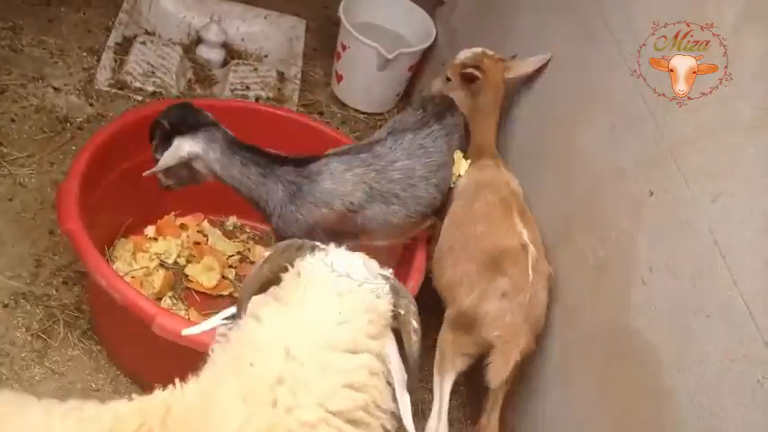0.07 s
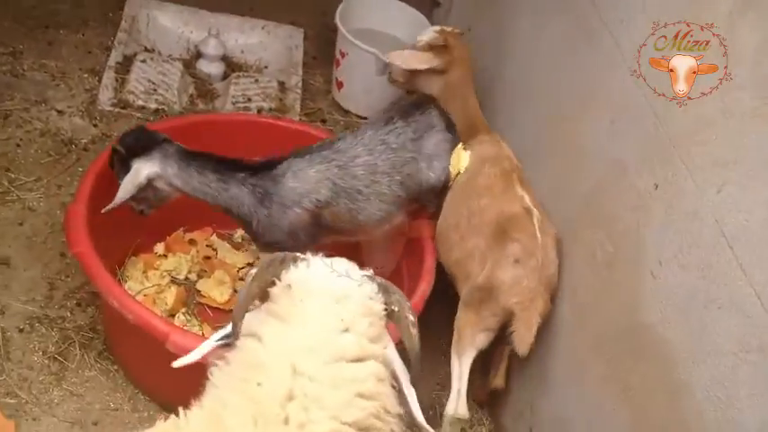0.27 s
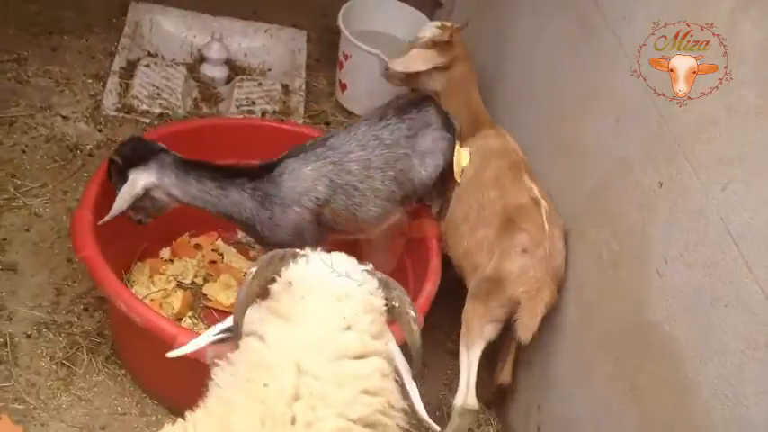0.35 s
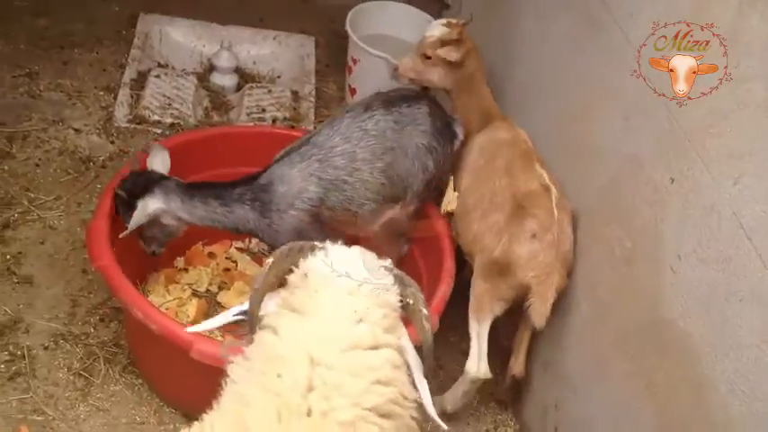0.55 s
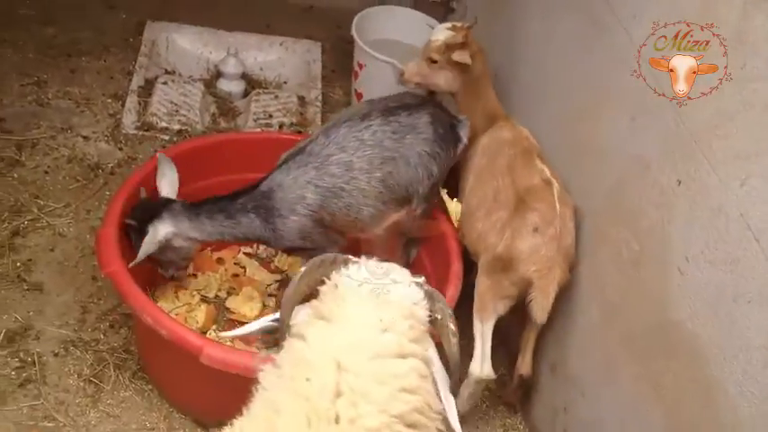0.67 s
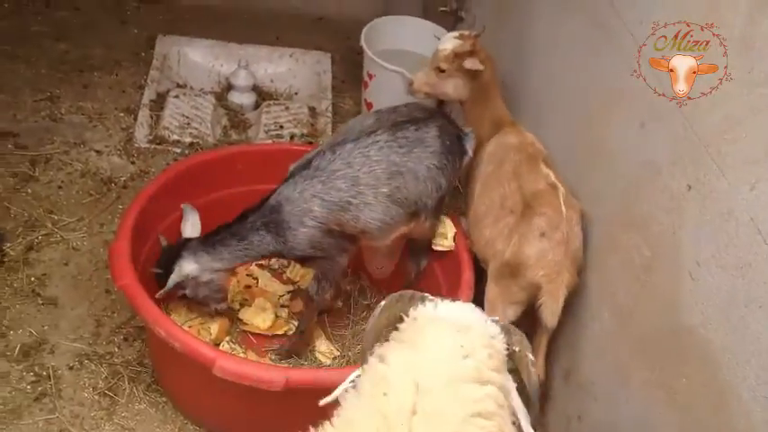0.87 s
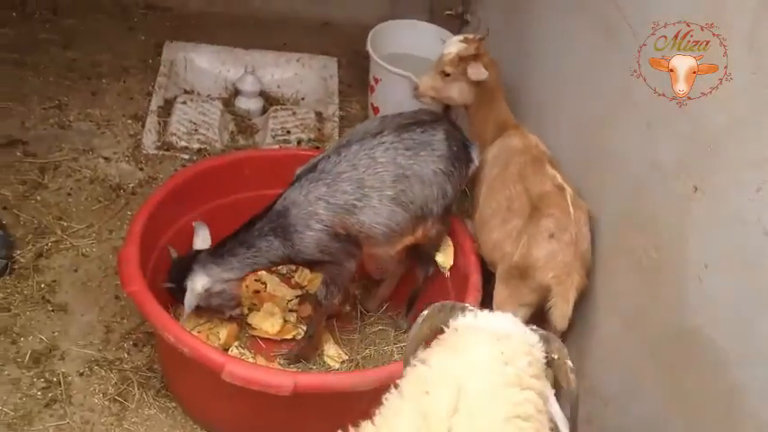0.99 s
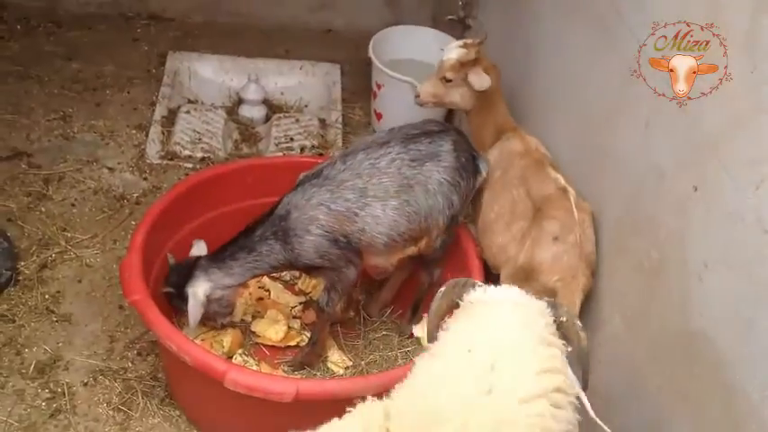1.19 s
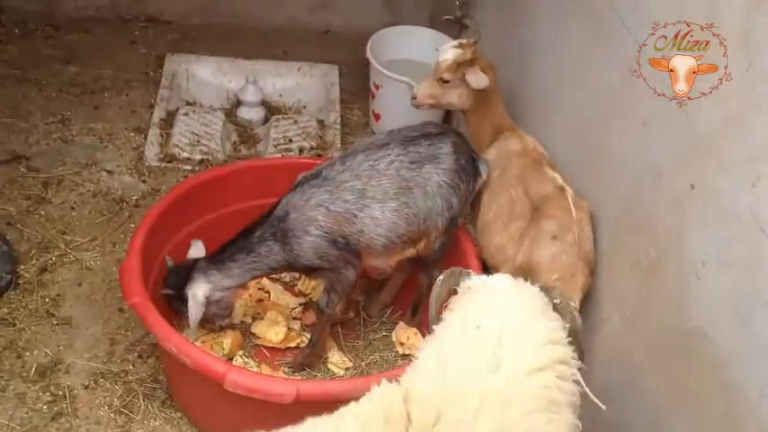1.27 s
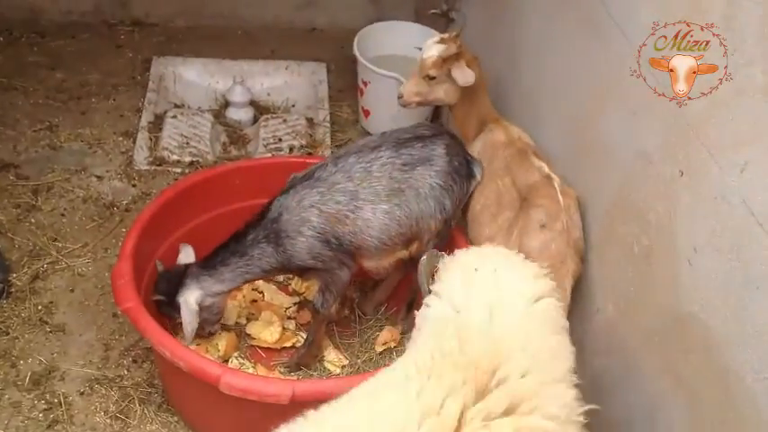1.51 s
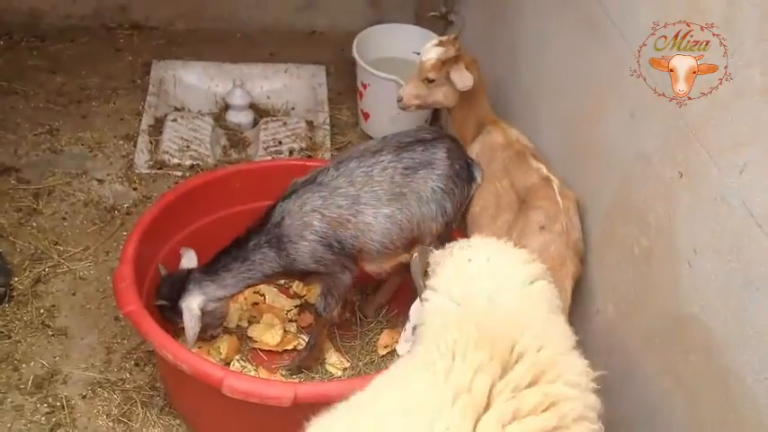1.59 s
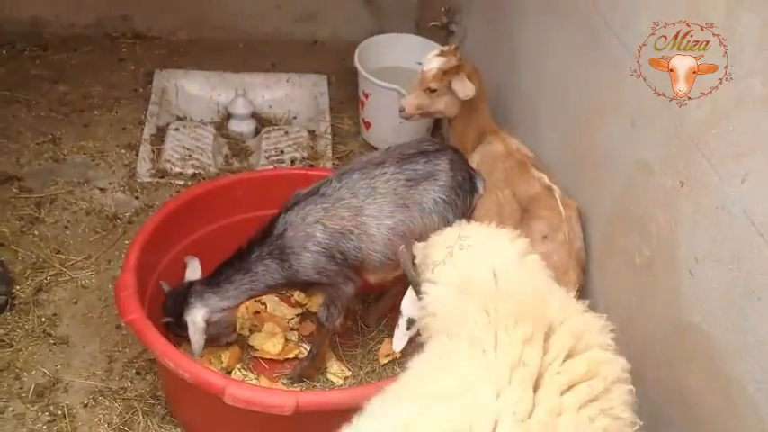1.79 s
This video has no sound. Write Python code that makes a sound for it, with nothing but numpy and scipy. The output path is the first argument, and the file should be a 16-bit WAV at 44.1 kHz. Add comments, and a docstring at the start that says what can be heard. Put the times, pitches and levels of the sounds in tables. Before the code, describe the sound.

Hollow knocks ring and rattle a plastic feed tub twice as a goat moves inside, rubbing the rim between them. Quiet hoof scuffs, bumps and dry straw crackles then fade over a faint hum in a small pen.

```python
"""Goat in a feed tub

A goat steps into a wide plastic tub in a small concrete pen: two hard knocks with rebounds, then softer
bumps, ring the hollow body and clatter the thin wall. A flank drags along the rim, hooves clack and
scuff, straw and dry feed rustle and crack as the animals shift, and a faint motor hums behind."""
import sys
import numpy as np
from scipy import signal
from scipy.fft import rfft, irfft
from scipy.io import wavfile

SR = 44100
rng = np.random.default_rng(int(sys.argv[2]) if len(sys.argv) > 2 else 0)


def materialize(psi):
    """Save the field psi as 16-bit PCM at rate SR to the path in sys.argv[1].

    A 1-D psi becomes a single channel; in a 2-D psi each row is a channel.
    """
    bounded = np.clip(np.atleast_2d(psi).T, -1, 1)
    quanta = np.round(bounded * 32767).astype(np.int16)
    wavfile.write(sys.argv[1], SR, quanta)


N = 81585
T = np.arange(N) / SR
HZ = np.maximum(np.fft.rfftfreq(N, 1 / SR), 1)


def from_db(db):
    """Decibels to gain."""
    return 10 ** (np.asarray(db) / 20)


def unit_rms(x):
    """Scale to rms 1."""
    return x / np.sqrt(np.mean(x ** 2) + 1e-20)


def at_hz(points, hz):
    """Read a curve on a log-frequency axis."""
    f, value = np.transpose(points)
    return np.interp(np.log(hz), np.log(f), value)


def coloured(noise, spectrum, tilt_db=0):
    """Shape noise with an EQ curve and a tilt per octave above 500 Hz; rms 1."""
    eq_db = at_hz(spectrum, HZ) + tilt_db * np.log2(np.maximum(HZ, 500))
    return unit_rms(irfft(rfft(noise) * from_db(eq_db), N))


def decaying(noise, t60s):
    """Let noise die away, each octave at its own rate."""
    octave = np.clip(np.log2(HZ / 100), 0, 7)
    spectrum = rfft(noise)
    bands = (irfft(spectrum * np.maximum(1 - abs(octave - k), 0), N) for k in range(8))
    return sum(band * from_db(-60 * T / at_hz(t60s, 100 * 2 ** k)) for k, band in enumerate(bands))


def swell(peak, rise, fall):
    """An envelope that rises and falls exponentially around its peak."""
    return np.exp(-np.maximum((peak - T) / rise, (T - peak) / fall))


def ring(modes, tilt_db=0, length=1, body_hz=267):
    """Struck modes: a harder blow favours those above the body note; a leaning leg shortens them."""
    out = np.zeros(N)
    for k, (hz, db, t60) in enumerate(modes):
        strike_db = db + tilt_db * np.log2(max(hz, body_hz) / 300)
        envelope = from_db(strike_db - 60 * T / (t60 * length))
        out += (-1) ** k * envelope * np.sin(2 * np.pi * hz * T)
    return out


def hit_at(start, blow, contact_s=0.0011):
    """Place a blow in time, its attack softened by the contact."""
    return np.interp(T - start, T, blow * (1 - np.exp(-T / contact_s)), left=0)


def background():
    """A slightly wavering motor hum in quiet air."""
    # room tone EQ: f/Hz, level/dB
    air_eq = [(25, -17), (55, -11.5), (85, -3.5), (160, -1), (300, 2.5), (600, -8), (1200, -9.5),
              (2500, -19), (6000, -21.5), (10500, -25)]
    # motor partials: f/Hz, level/dB
    partials = [(80.7, -82), (161.5, -67.5), (242.2, -78.5), (274.5, -83)]
    # fader ride on the hum: t/s, gain/dB
    hum_ride = [(0, -7), (0.75, -14.5), (1.0, -5.5), (1.25, 0.5), (1.85, 1)]
    air_db, waver_depth = -70, 0.088
    ride_db = np.interp(T, *np.transpose(hum_ride))
    out = from_db(air_db) * coloured(rng.standard_normal(N), air_eq)
    for hz, db in partials:
        waver = unit_rms(irfft(rfft(rng.standard_normal(N)) * np.exp(-HZ / 6), N))
        tone = np.sqrt(2) * np.sin(2 * np.pi * (hz * T + rng.random()))
        out += from_db(db + ride_db) * (1 + waver_depth * waver) * tone
    return out


def pen_reverb(x):
    """Short diffuse reverberation between concrete walls."""
    # reverb decay: f/Hz, t60/s
    decay = [(150, 0.41), (400, 0.35), (1000, .27), (4000, 0.31), (10000, .24)]
    wet_db, predelay_s = -16.5, 0.011
    tail = decaying(rng.standard_normal(N), decay) * np.clip(T / predelay_s - 1, 0, 1)
    return from_db(wet_db) * signal.fftconvolve(x, tail / np.sqrt(np.sum(tail ** 2)))[:N]


def straw_rustle():
    """Each shift of weight is a swell of tiny stalk snaps over sliding hiss."""
    # swells of straw and feed: peak t/s, level/dB, rise/s, fall/s, tilt/dB per octave
    rustles = [(0.005, -56.5, 0.053, 0.021, -0.5), (0.063, -56, 0.018, 0.023, 2),
               (0.116, -57.5, 0.03, 0.021, -2), (0.181, -56.5, 0.064, 0.15, -3.5),
               (0.305, -44, 0.013, 0.031, -19), (0.374, -47, 0.037, 0.052, -1),
               (0.403, -49, 0.042, 0.032, -1.5), (0.512, -46, 0.012, 0.041, -2),
               (0.568, -59, 0.033, 0.062, 3.5), (0.691, -56.5, 0.014, 0.03, -1),
               (0.803, -52, 0.011, 0.033, 2), (0.852, -50, .012, .018, -2.5),
               (1.009, -59, 0.024, 0.025, -5), (1.056, -60, 0.017, 0.021, 3), (1.10, -59, 0.037, 0.12, -3),
               (1.153, -64, 0.021, 0.048, 3), (1.19, -58.5, .006, 0.019, 2.5),
               (1.298, -61.5, 0.01, 0.021, 0.5), (1.483, -62.5, 0.021, 0.025, 1.5),
               (1.557, -67, 0.0078, 0.05, 1.5), (1.779, -69.5, 0.047, 0.075, 1)]
    # rustle EQ: f/Hz, level/dB
    straw_eq = [(150, -4.5), (400, 7.5), (1000, 3), (2000, -2), (4000, -2), (7500, -2.5), (10500, -9.5)]
    snaps_per_s, spread_db = 2500, 4.5
    out = np.zeros(N)
    for peak, db, rise, fall, tilt_db in rustles:
        sizes = from_db(spread_db * np.minimum(rng.exponential(1, N), 4))
        signs = rng.choice([-1, 1], N)
        snaps = unit_rms(sizes * signs * (rng.random(N) < snaps_per_s / SR))
        hiss = rng.standard_normal(N)
        out += from_db(db) * swell(peak, rise, fall) * coloured(snaps + hiss, straw_eq, tilt_db)
    return out


def stalk_cracks():
    """A dry stalk gives way at once under a hoof: a short, bright burst."""
    # breaking stalks: t/s, level/dB
    cracks = [(0.061, -59.5), (0.37, -53), (0.798, -53), (1.1758, -48)]
    # crack EQ: f/Hz, level/dB
    crack_eq = [(300, -17), (2500, -12), (4500, -3), (7200, 4), (10500, -6)]
    fall_s = 0.0069
    out = np.zeros(N)
    for start, db in cracks:
        burst = from_db(db) * np.exp(-T / fall_s) * coloured(rng.standard_normal(N), crack_eq)
        out += np.interp(T - start, T, burst, left=0)
    return out


def hooves():
    """Light, hard contacts on the tub floor: a clack and a short scuff."""
    # hoof falls: t/s, clack level/dB, scuff level/dB
    steps = [(0.001, -64, -49), (0.1445, -51, -52.5), (0.214, -52, -62.5), (0.391, -54, -49),
             (0.8445, -46, -43.5), (0.8658, -46.5, -54), (0.955, -68, -64), (0.997, -57.5, -62.5)]
    # modes of the tub floor: f/Hz, level/dB, t60/s
    floor_modes = [(262, -9.5, 0.092), (319, -10, 0.22), (749, -4, 0.15), (795, -1.5, 0.13),
                   (926, -3.5, 0.091), (1003, -1.5, .08), (1130, -13.5, .1), (1750, -9, 0.069)]
    # scuff EQ: f/Hz, level/dB
    scuff_eq = [(100, -14), (300, 1), (900, 0.5), (1400, -4.5), (2400, -2), (4000, -10.5), (10500, -22)]
    # scuff decay: f/Hz, t60/s
    scuff_decay = [(300, 0.32), (2000, 0.14), (9000, 0.063)]
    clack = ring(floor_modes)
    out = np.zeros(N)
    for start, clack_db, scuff_db in steps:
        scuff = decaying(coloured(rng.standard_normal(N), scuff_eq), scuff_decay)
        out += hit_at(start, from_db(clack_db) * clack + from_db(scuff_db) * scuff)
    return out


def flank_rubs():
    """A flank drags along the rim: uneven stick and slip shakes the low resonances of the wall."""
    # drags: peak t/s, level/dB, rise/s, fall/s
    rubs = [(0.359, -49, 0.011, 0.0082), (0.401, -37, 0.024, 0.019), (0.575, -46.5, 0.022, 0.024),
            (0.805, -66, 0.019, 0.019), (1.245, -71, .02, .03)]
    # resonances of the shuddering wall: f/Hz, width/Hz, level/dB
    resonances = [(141, 28, -6), (214, 12, 0.5), (356, 37, -17), (417, 19, -27), (906, 24, -10.5)]
    slips_per_s, jitter = 200, 0.18
    out = np.zeros(N)
    for peak, db, rise, fall in rubs:
        gaps_s = np.exp(jitter * rng.standard_normal(1000)) / slips_per_s
        slip_samples = (np.cumsum(gaps_s) * SR).astype(int)
        slips = np.bincount(slip_samples[slip_samples < N], minlength=N).astype(float)
        shudder = np.zeros(N)
        for k, (hz, width, level) in enumerate(resonances):
            resonator = signal.iirpeak(hz, hz / width, fs=SR)
            shudder += (-1) ** k * from_db(level) * signal.lfilter(*resonator, slips)
        out += from_db(db) * swell(peak, rise, fall) * unit_rms(shudder)
    return out


def tub_knocks():
    """Each knock of a leg rings the hollow body and sets the thin wall clattering."""
    # knocks: t/s, body level/dB, hardness as tilt/dB per octave, ring length/ratio, clatter level/dB
    knocks = [(0.1115, -50.5, -28, 0.87, -57.5), (0.155, -56, -9, 1.55, -54),
              (0.2399, -19.5, 2, 0.86, -35.5), (0.245, -26.5, 4.5, 0.4, -36),
              (0.2581, -21, 2.5, 0.29, -45.5), (0.2766, -39, 3.5, 1.63, -43), (0.297, -43, 1, .8, -39.5),
              (0.324, -41, -2.5, 0.64, -50.5), (0.4746, -44, 0, 0.86, -64),
              (0.5155, -24.5, -2.5, 0.78, -33), (0.525, -22, -6.5, 0.23, -44.5),
              (0.565, -38.5, -8, 0.8, -76), (0.6035, -42, -20, 0.77, -69),
              (0.6426, -54.5, -18, 1.53, -59.5), (1.055, -53.5, -3.5, 0.9, -59.5),
              (1.0885, -40.5, -12.5, 0.79, -67), (1.1456, -41.5, -10.5, 0.62, -70)]
    # modes of the hollow body: f/Hz, level/dB, t60/s
    body_modes = [(175.8, -23.5, 0.36), (210, -8, .16), (276.8, 11, 0.054), (308.3, 13.5, 0.048),
                  (330.8, -4.5, 0.23), (348.5, -14.5, 0.31), (412.7, -9.5, 0.29), (448, -2, 0.14),
                  (510.3, -10.5, 0.32), (668.4, -7.5, 0.15), (752, -27, 0.58), (826, -14, 0.28),
                  (883, -12, 0.18), (920.5, -21, 0.2), (1030, -10.5, 0.15), (1158, -25, 0.22),
                  (1277, -19.5, 0.19), (1664, -28, 0.19), (2233, -30, 0.15)]
    # dense modes of the thin wall, as an EQ: f/Hz, level/dB
    wall_eq = [(60, -12), (130, -10.5), (400, -2.5), (1000, -0.5), (1500, -5.5), (2300, -4), (3300, -10.5),
               (5500, -20.5), (10500, -34)]
    # clatter decay: f/Hz, t60/s
    wall_decay = [(150, 0.29), (1000, .18), (3000, 0.16), (9000, 0.16)]
    clatter_attack = 1 - np.exp(-T / 0.00082)
    out = np.zeros(N)
    for start, body_db, tilt_db, length, clatter_db in knocks:
        body = ring(body_modes, tilt_db, length)
        clatter = decaying(coloured(rng.standard_normal(N), wall_eq), wall_decay) * clatter_attack
        out += hit_at(start, from_db(body_db) * body + from_db(clatter_db) * clatter)
    return out


def scene():
    """The animals and their reverb over the background, in mono."""
    animals = tub_knocks() + flank_rubs() + hooves() + straw_rustle() + stalk_cracks()
    return (animals + pen_reverb(animals) + background())[None]


def record(dry):
    """Roll off the deep bass and cut the top steeply."""
    low_cut = signal.butter(4, 85, "high", fs=SR, output="sos")
    high_cut = signal.ellip(10, 0.2, 70, 10850, fs=SR, output="sos")
    return signal.sosfilt(high_cut, signal.sosfilt(low_cut, dry))


dry = scene()
out = record(dry)
materialize(out)
```